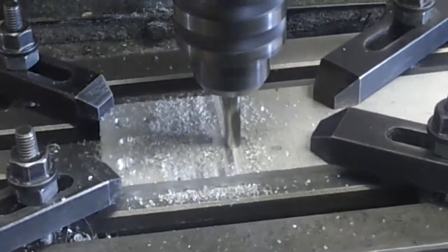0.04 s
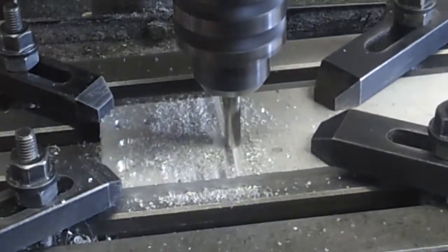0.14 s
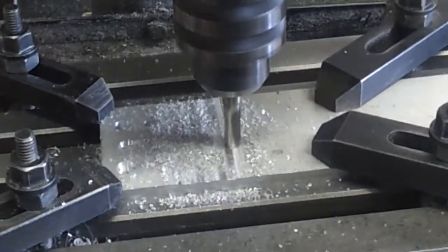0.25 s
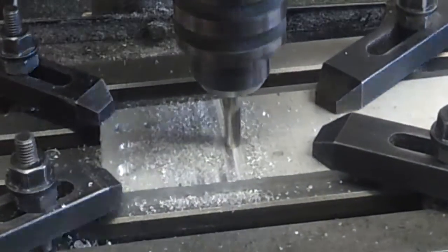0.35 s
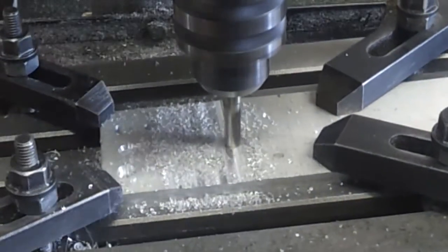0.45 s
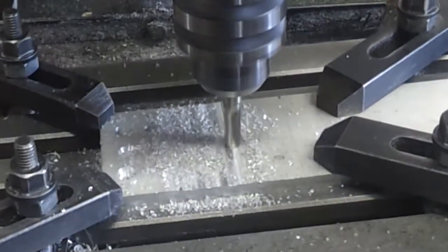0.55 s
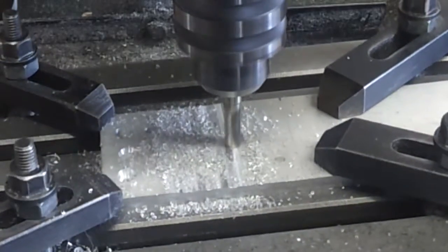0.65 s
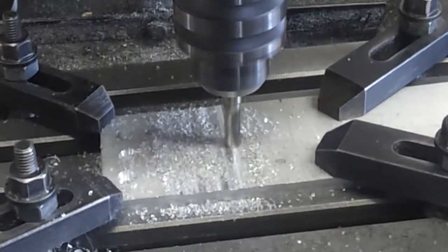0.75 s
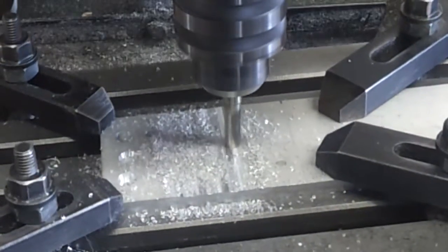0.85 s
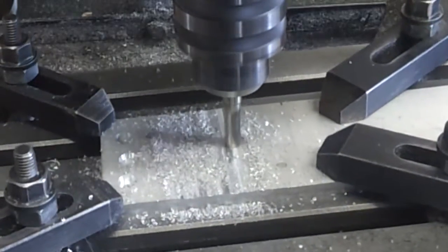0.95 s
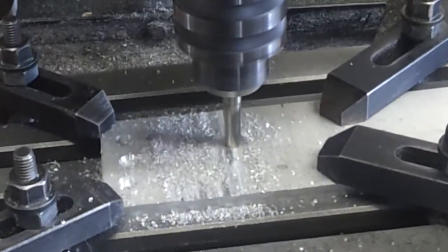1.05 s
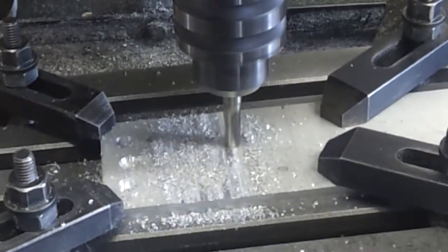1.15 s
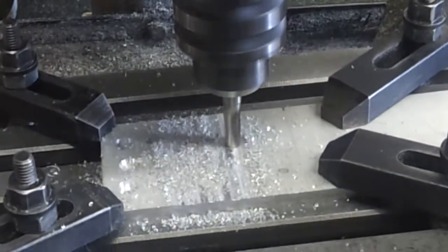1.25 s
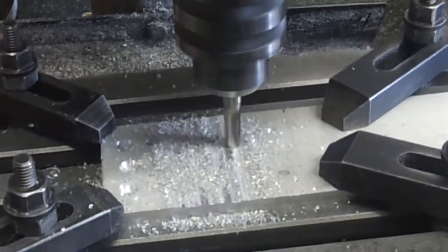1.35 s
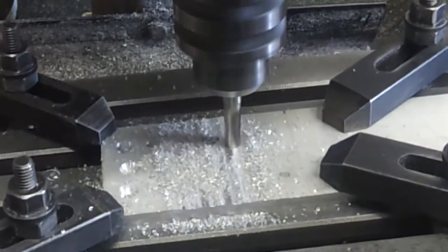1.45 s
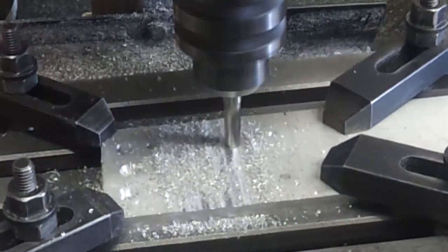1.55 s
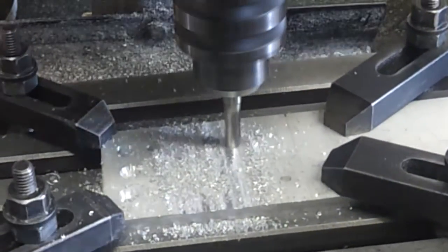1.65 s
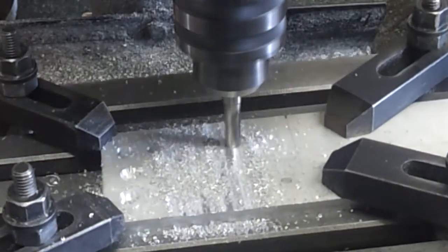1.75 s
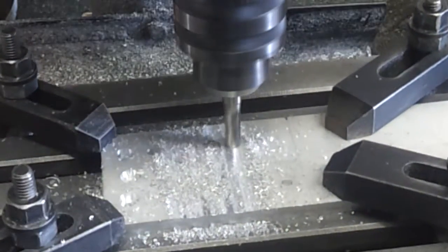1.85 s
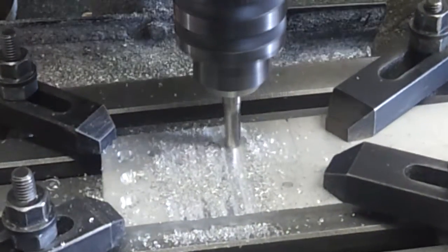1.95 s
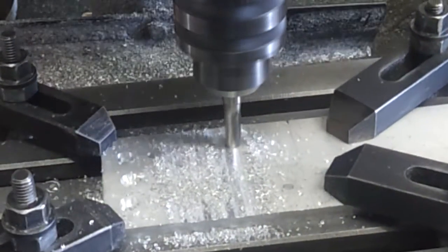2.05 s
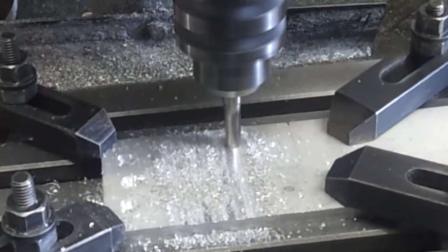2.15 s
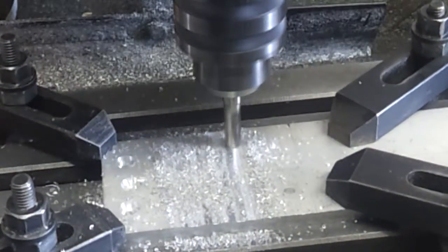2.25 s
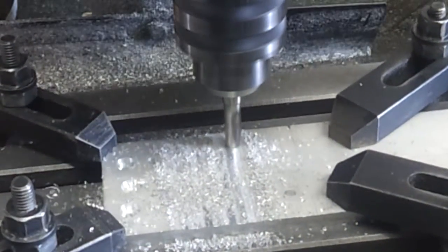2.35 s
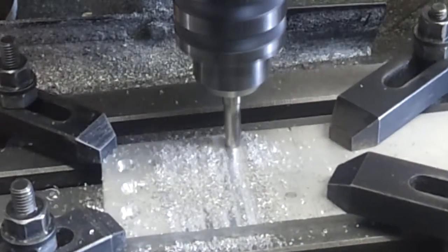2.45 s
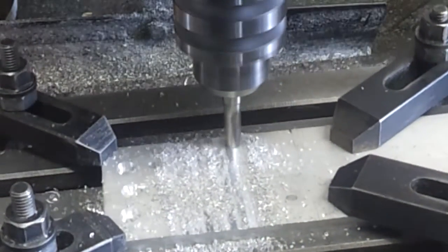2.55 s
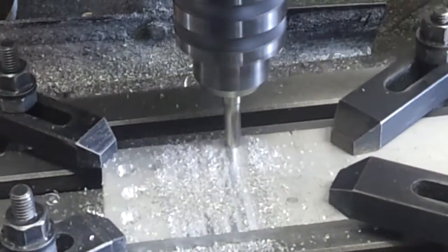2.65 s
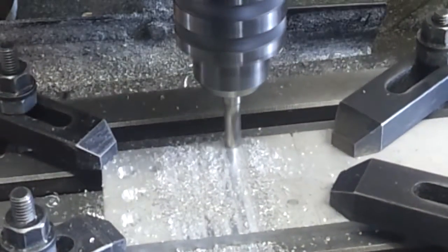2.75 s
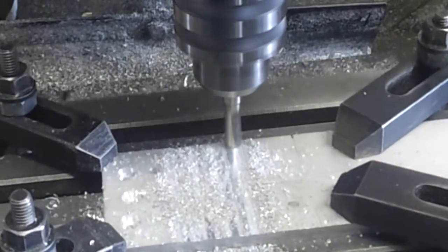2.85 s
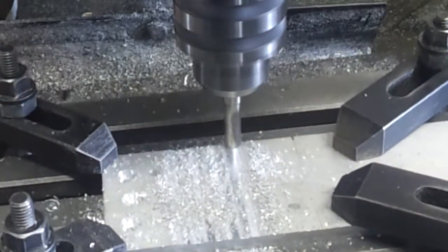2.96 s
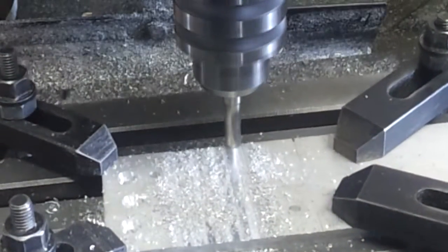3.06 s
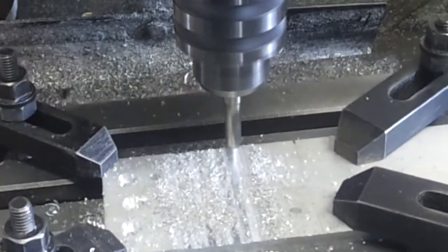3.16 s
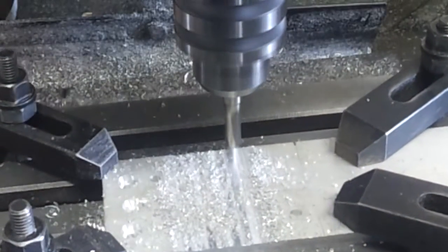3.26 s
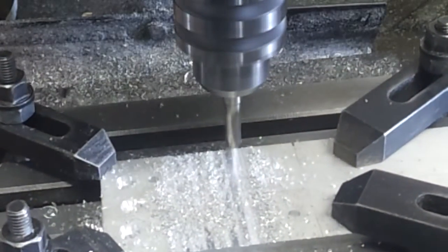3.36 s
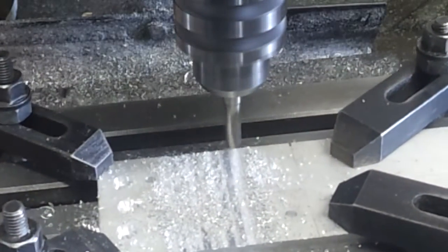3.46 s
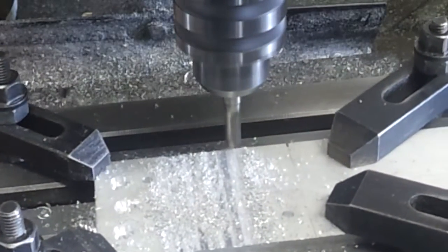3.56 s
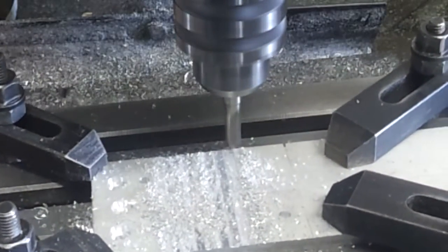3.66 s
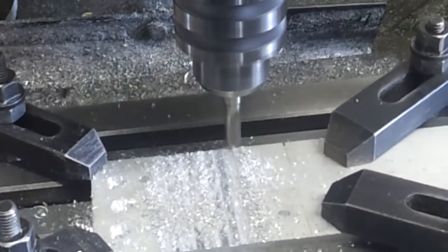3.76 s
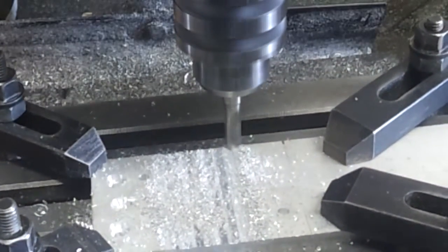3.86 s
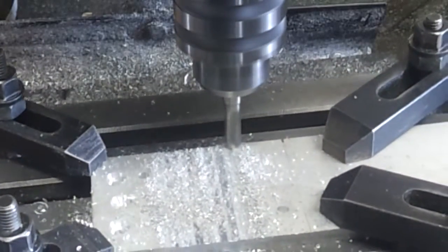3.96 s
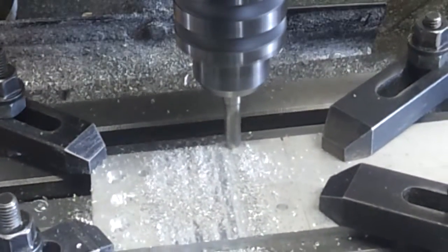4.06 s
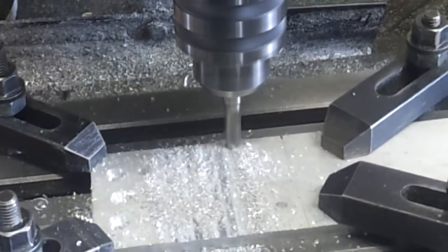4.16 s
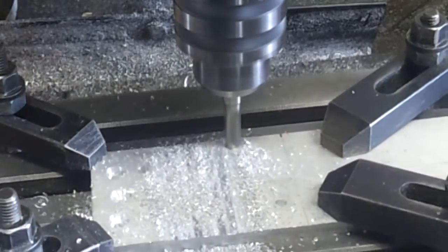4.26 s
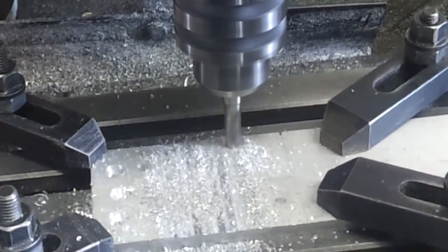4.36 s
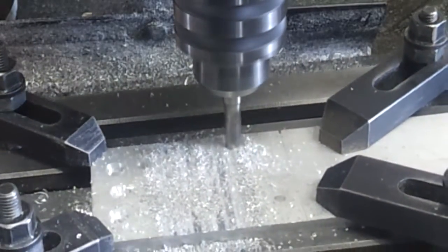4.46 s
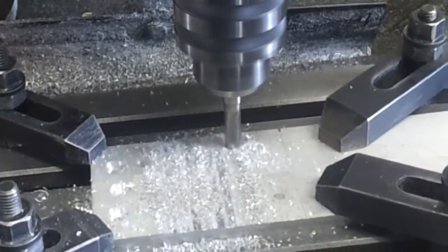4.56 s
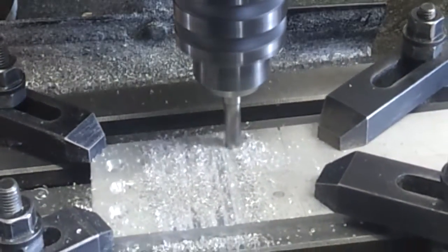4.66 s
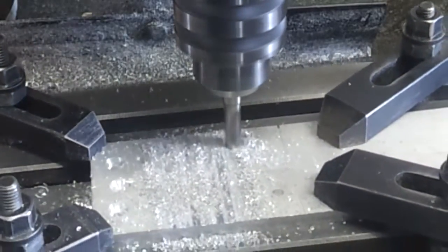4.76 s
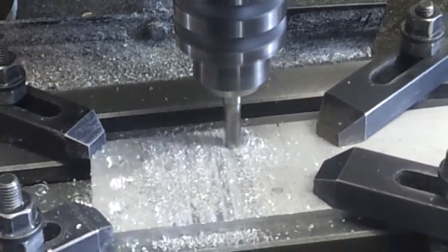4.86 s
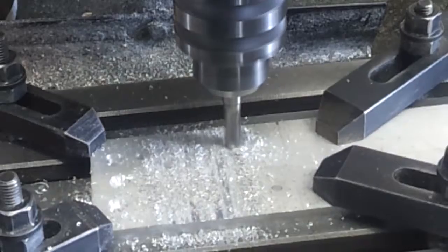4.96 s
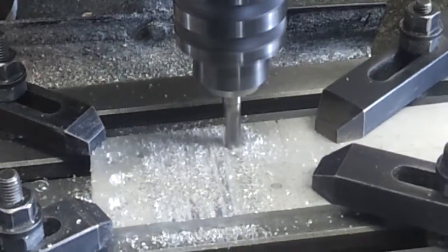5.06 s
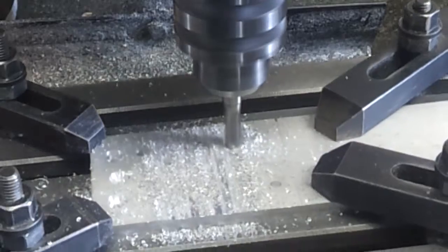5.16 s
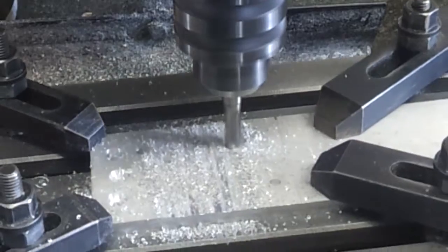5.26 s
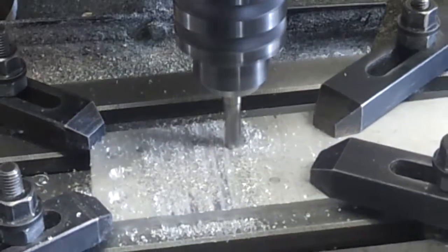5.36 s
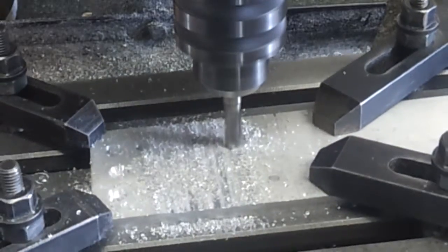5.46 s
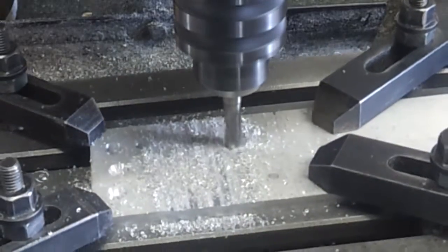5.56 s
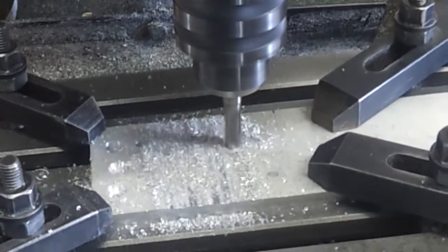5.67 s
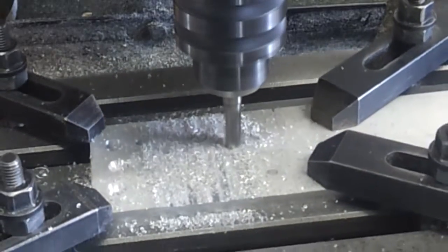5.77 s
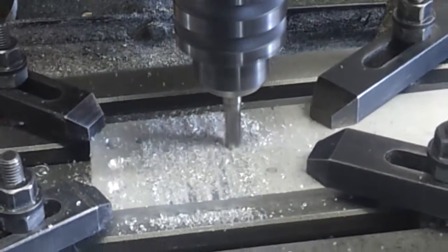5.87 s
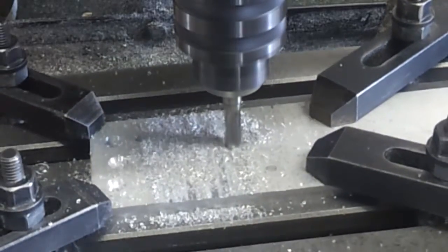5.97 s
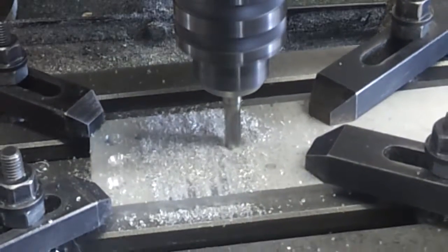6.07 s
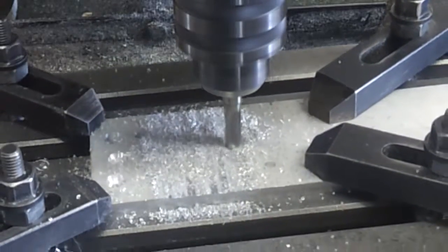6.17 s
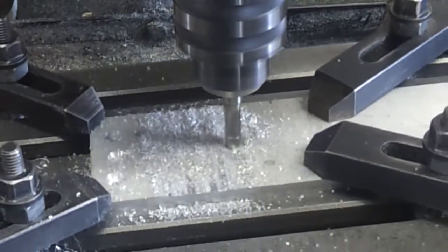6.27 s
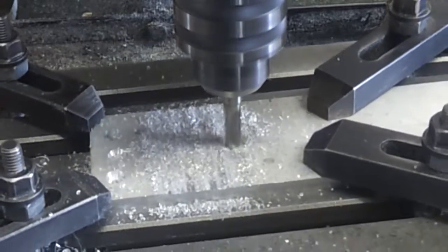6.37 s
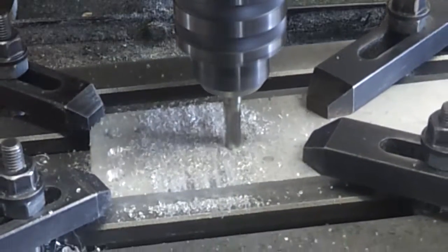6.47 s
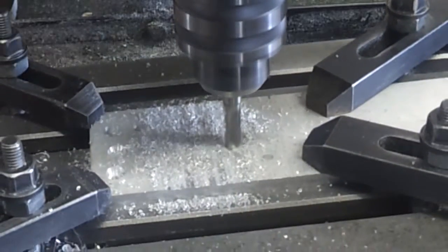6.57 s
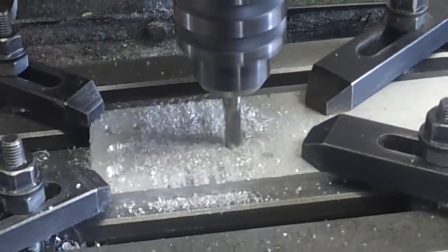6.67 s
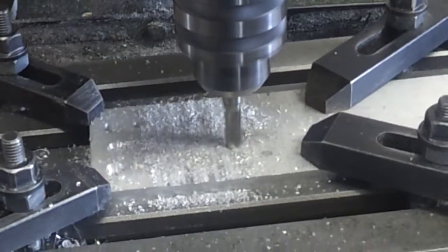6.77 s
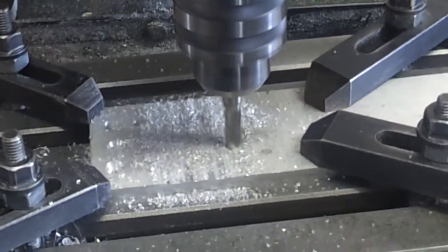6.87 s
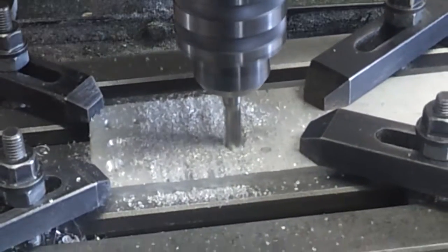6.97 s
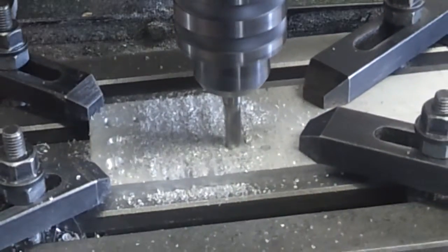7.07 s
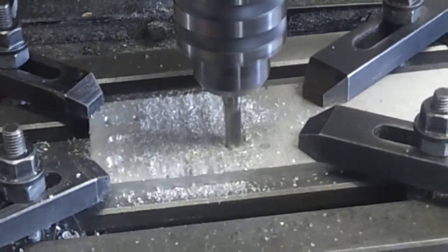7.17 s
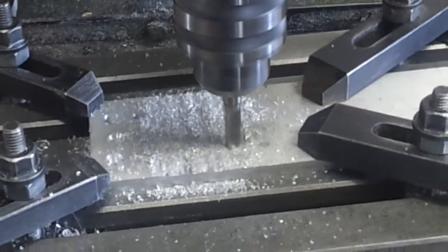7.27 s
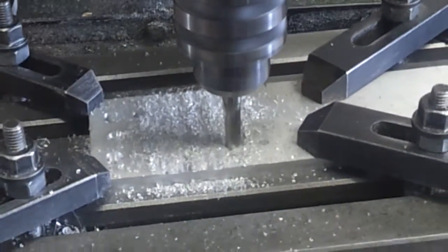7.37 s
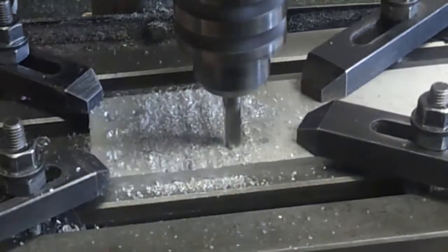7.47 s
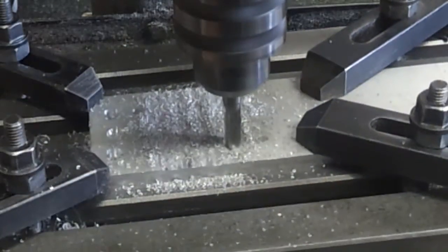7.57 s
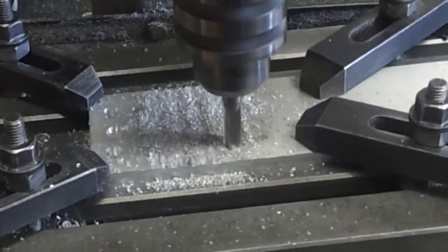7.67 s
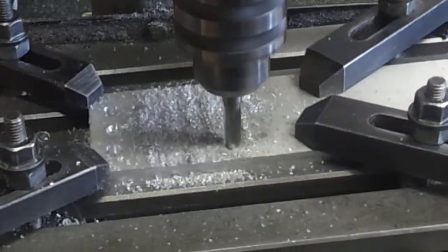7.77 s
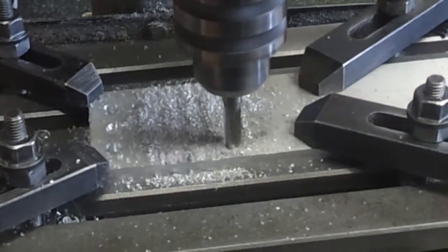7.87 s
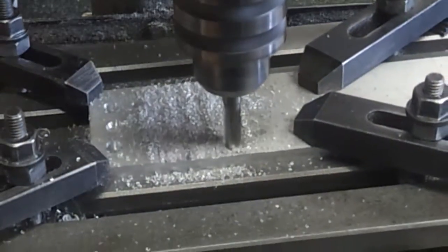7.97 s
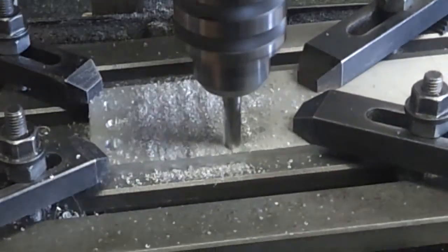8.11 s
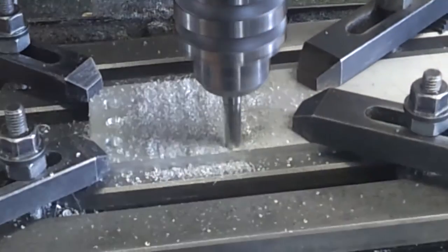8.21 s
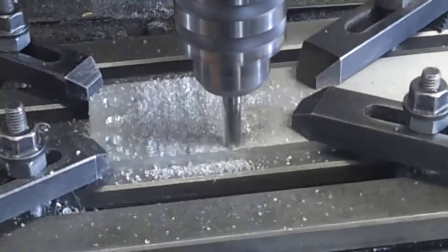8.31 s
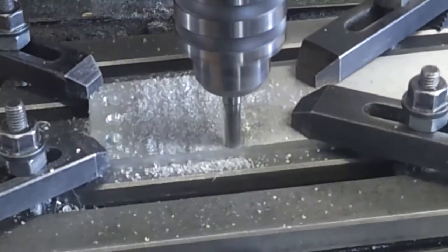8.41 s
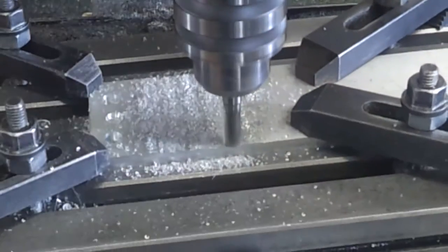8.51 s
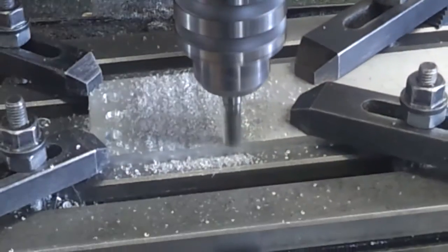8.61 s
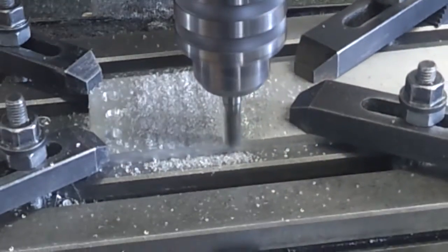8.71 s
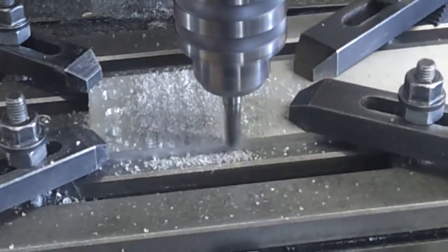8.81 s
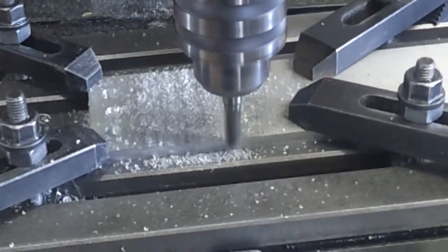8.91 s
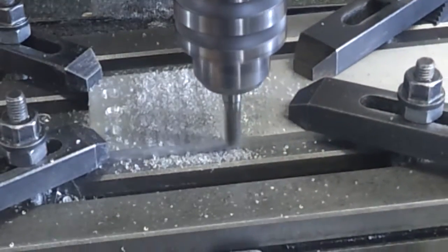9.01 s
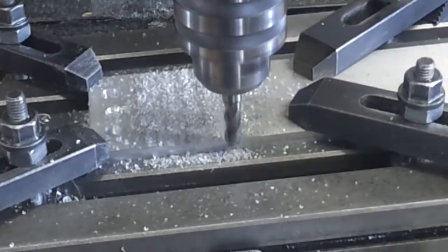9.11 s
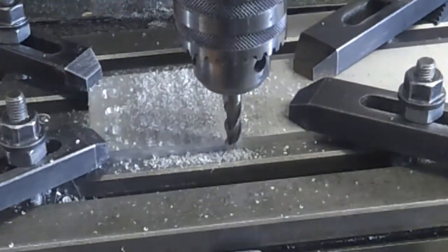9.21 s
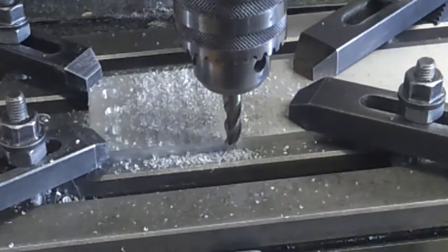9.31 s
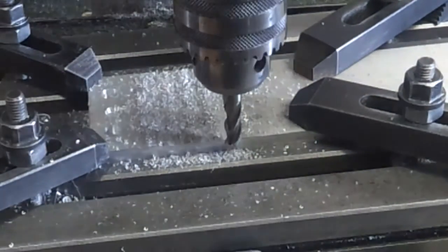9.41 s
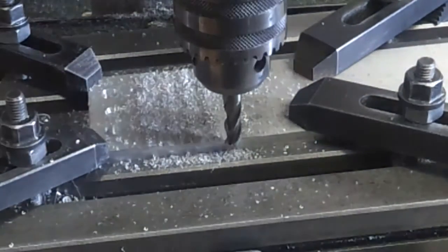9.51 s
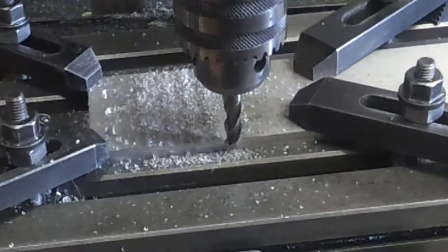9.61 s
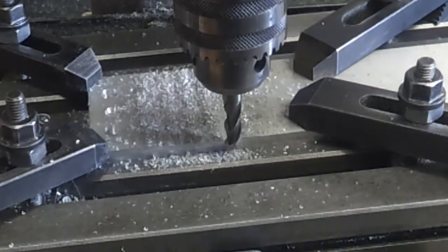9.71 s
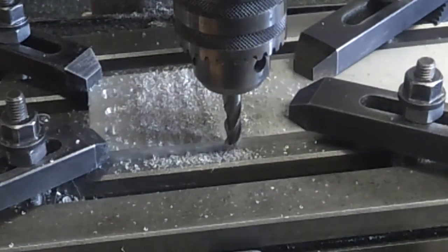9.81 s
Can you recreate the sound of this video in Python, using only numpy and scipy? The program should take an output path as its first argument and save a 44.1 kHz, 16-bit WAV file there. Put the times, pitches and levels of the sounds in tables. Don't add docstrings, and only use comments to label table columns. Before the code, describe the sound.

Close-up milling: gritty metal cutting noise fluttering fast under piercing steady whines, ending in stop jolts, a brief dropout, electric fizz and a clunk.

```python
import sys
import numpy as np
from scipy import signal
from scipy.fft import rfft, irfft, next_fast_len
from scipy.io import wavfile
from scipy.ndimage import uniform_filter1d, minimum_filter1d

SR = 44100
rng = np.random.default_rng(int(sys.argv[2]) if len(sys.argv) > 2 else 0)


def to_wav(sig):
    pcm = np.clip(np.atleast_2d(sig), -1, 1) * 32767
    pcm = np.round(pcm).astype(np.int16)
    wavfile.write(sys.argv[1], SR, pcm.T)


def makeup_ratio(level_db):
    decades = np.asarray(level_db, float) / 20
    return 10 ** decades


N = 434385
TIME, PADDED = np.arange(N) / SR, next_fast_len(N, True)
FREQ = np.fft.rfftfreq(PADDED, 1 / SR) + 1e-3
TURN_HZ = 46.875
STOP_S = 8.83
REST_S = (3.155, 3.59)
TOP_HZ = 14560


def unit(x):
    return x / np.sqrt(np.mean(x ** 2))


def colour(points, rings=()):
    hz, db = np.transpose(points)
    power = makeup_ratio(np.interp(np.log(FREQ), np.log(hz), db)) ** 2
    for centre_hz, width_hz, ring_db in rings:
        power = power + makeup_ratio(ring_db) ** 2 / (1 + (2 * (FREQ - centre_hz) / width_hz) ** 2) ** 2
    return np.sqrt(power)


def noise(gain):
    return irfft(gain * rfft(rng.standard_normal(PADDED)), PADDED)[:N]


def band(lo_hz, hi_hz):
    return 1 / np.sqrt((1 + (lo_hz / FREQ) ** 6) * (1 + (FREQ / hi_hz) ** 6))


def ring(hz, width_hz):
    return unit(noise(1 / (1 + (2 * (FREQ - hz) / width_hz) ** 2)))


def walk(rate_hz):
    k = int(SR / rate_hz)
    steps = np.repeat(rng.standard_normal(N // k + 1), k)
    return unit(uniform_filter1d(uniform_filter1d(steps, k), k)[:N])


def bursts(times_s, sizes, rise_s, fall_s):
    t = np.arange(int(.08 * SR)) / SR
    shape = (1 - np.exp(-(t / rise_s) ** 2)) * np.exp(-t / fall_s)
    starts = np.zeros(N)
    np.add.at(starts, np.clip((np.asarray(times_s) * SR).astype(int), 0, N - 1), sizes)
    return signal.fftconvolve(starts, shape / shape.max())[:N]


def during(start_s, stop_s, edge_s=.007):
    return np.clip(np.minimum(TIME - start_s, stop_s - TIME) / edge_s + .5, 0, 1)


def place():
    return np.maximum(np.maximum(REST_S[0] - TIME, TIME - REST_S[1]), 0)


def whine(hz, level_db, wobble_hz, wobble_db):
    phase = 2 * np.pi * np.cumsum(hz + wobble_hz * walk(45)) / SR
    return np.sqrt(2) * makeup_ratio(level_db + wobble_db * walk(30)) * np.sin(phase)


def hold():
    # from/s, to/s, first level/dB, last level/dB, whistle/dB
    holds = [
        (3.17, 3.56, -27.5, -27.5, -25),
        (8.767, 9.1, -24, -24.5, -33),
        (9.14, 9.9, -21.5, -19.5, -37),
    ]
    # f/Hz, density/dB per Hz
    fizz_colour = [(71, -101), (120, -73), (169, -25.5), (314, -23), (1010, -25), (2800, -26),
                   (5210, -28.5), (6000, -26.5), (10100, -18), (11400, -16), (12600, -15), (14500, -13.5)]
    # f/Hz, width/Hz, level/dB
    fizz_rings = [(318, 14, -14.5), (3020, 1240, -22.5), (11770, 90, -10.5), (12900, 64, -4),
                  (12670, 800, -4)]
    fizz = unit(noise(colour(fizz_colour, fizz_rings)))
    whistle = ring(12600, 490)
    out = 0
    for start_s, stop_s, first_db, last_db, whistle_db in holds:
        fizz_gain = makeup_ratio(np.interp(TIME, (start_s, stop_s), (first_db, last_db)))
        out = out + during(start_s, stop_s, .015) * (fizz_gain * fizz + makeup_ratio(whistle_db) * whistle)
    return makeup_ratio(0.62 * walk(40)) * out


def feed():
    # travel from rest/s, level/dB
    core_levels = [(0, -30.5), (.6, -27.5), (1.3, -26), (2.2, -28.5), (2.95, -33), (3.6, -29), (5.2, -22.5)]
    # f/Hz, width/Hz, level/dB
    overtones = [(9360, 40, -16), (9542, 45, -17)]
    feed_hz, off_s = 3025, 8.742
    rough = sum(makeup_ratio(db) * ring(hz, width_hz) for hz, width_hz, db in overtones)
    skirt = makeup_ratio(-39.5) * ring(feed_hz, 110)
    core = whine(feed_hz, np.interp(place(), *np.transpose(core_levels)), 4.92, 0.3)
    out, back = during(-1, REST_S[0]), during(REST_S[1], off_s)
    return (out + back) * (core + skirt) + (makeup_ratio(-27) * out + makeup_ratio(-39) * back) * rough


def spindle():
    # travel from rest/s, width/s, level out/dB, level back/dB
    dips = [(1.0, 0.17, -13, -6.5), (1.6, .35, -1.5, 3), (2.27, .15, -14, -9), (2.85, 0.22, -6, -0.5),
            (3.2, .2, 0, 0), (3.89, .2, -1, -14.5)]
    off_s = 8.78
    out = TIME < REST_S[1]
    back_shift_s, back_stretch = .27, .85
    at_s = np.where(out, place(), back_shift_s + back_stretch * place())
    dips_db = 0
    for s, width_s, out_db, back_db in dips:
        dips_db = dips_db + np.where(out, out_db, back_db) * np.exp(-((at_s - s) / width_s) ** 2)
    return during(-1, off_s) * whine(11175.5, -23 + dips_db, 3.2, 1.0)


def clunk():
    # t/s, level/dB, ring length factor
    blows = [
        (9.681, -19, .5),
        (9.691, -18, 1.7),
        (9.71, -4, 0.48),
        (9.7123, -3, 0.27),
        (9.716, -9, 0.96),
        (9.723, -9, 0.82),
        (9.728, -10, 0.65),
        (9.732, -14, .9),
        (9.743, -19, .9),
        (9.749, -18, .9),
    ]
    # f/Hz, level/dB, t60/s
    modes = [(234, -18, 0.14), (477, -17, 0.047), (686, -4, 0.046), (930, 0.5, 0.045), (1380, -6, 0.022),
             (2600, -16, .02), (3500, -11, .015)]
    t, out = np.arange(int(.2 * SR)) / SR, np.zeros(N + SR)
    hz, db, t60_s = np.transpose(modes)[:, :, None]
    chance = rng.standard_normal((len(blows), 2, len(modes), 1))
    for (s, blow_db, length), (size, detune) in zip(blows, chance):
        decay_db = 60 * t / t60_s / length
        tones = np.sin(2 * np.pi * hz * (1 + 0.05 * detune) * t)
        rings = makeup_ratio(db + 2.6 * size - decay_db) * tones
        out[int(s * SR):int(s * SR) + len(t)] += 0.29 * makeup_ratio(blow_db) * rings.sum(0)
    tail_s = 9.712
    tail_gain = (TIME > tail_s) * makeup_ratio(-28.0 - 160 * np.abs(TIME - tail_s))
    tail = tail_gain * unit(noise(band(150, 3400)))
    return irfft((rfft(out, PADDED) + rfft(tail, PADDED)) * band(160, 9000), PADDED)[:N]


def jolts():
    # t/s, peak/dB, low/dB, middle/dB, high/dB
    scrapes = [
        (8.763, -4, -20, -29, -25),
        (8.788, -8, -24, -30, -28),
        (8.819, -7, -23, -38, -35),
        (8.842, -6, -25, -27, -13),
        (8.894, -14, -35, -36, -33),
        (8.927, -9, -31.5, -30, -17.5),
        (9.019, -9, -41, -39, -28),
    ]
    s, _, *levels_db = np.transpose(scrapes)
    ranges = ((350, 1240, 1.1), (1600, 3100, 1.4), (5530, 22000, -1.5))  # low/Hz, high/Hz, level/dB
    out = 0
    for level_db, (lo_hz, hi_hz, more_db) in zip(levels_db, ranges):
        envelope = bursts(s - .002, makeup_ratio(level_db + more_db), rise_s=.005, fall_s=.007)
        out = out + envelope * unit(noise(band(lo_hz, hi_hz)))
    return out


def plate():
    level_db = np.interp(TIME, (0, 3.6), (-37, -29))
    fade_db = 185 * np.maximum(TIME - STOP_S, 0)
    return makeup_ratio(level_db - fade_db) * ring(693.3, 51)


def cut():
    # from/Hz, to/Hz
    level_bands = [(150, 550), (600, 1000), (1100, 1800), (1900, 2800), (6000, 10500)]
    splits_hz = [0, 580, 1050, 1850, 5600, 30000]
    # f/Hz, density/dB per Hz
    cut_colour = [(25, -42), (90, -22.5), (170, -20.5), (290, -9.5), (560, -12), (950, -6.5), (1050, -20),
                  (1700, -24), (2300, -24.5), (4500, -24), (6200, -50.5), (8500, -36), (11000, -30.5),
                  (14500, -34)]
    # f/Hz, width/Hz, level/dB
    frame_rings = [(357, 33, -14.5), (876, 66, -1), (914.6, 44, -0.5), (1311, 86, -12), (1415, 40, -17.5),
                   (1542, 166, -16.5), (1970, 80, -32), (3430, 270, -19.5), (5370, 88, -26.5),
                   (6320, 250, -39.5), (7015, 120, -36), (7570, 50, -37), (9440, 130, -29),
                   (10900, 130, -23.5)]
    # t/s, peak/dB, edge minus peak/dB
    bites = [(0.612, -9, -27), (1.041, -18, -22), (1.211, -10.5, -18), (1.453, -8, -18), (1.7, -13, -10),
             (2.062, -4, -28), (2.625, -13, -8), (3.495, -3.5, -19), (3.558, -9, -6), (3.682, -2, -13),
             (3.986, -9, -16), (4.049, -5.5, -22), (4.412, -9, -8), (4.668, -6, -25), (5.398, -8, -2),
             (5.523, -6.5, -17), (5.63, -5, -13), (5.651, -7.5, -13), (5.754, -10.5, -9), (5.847, -10, -13),
             (5.956, -5, -8), (6.099, 3.5, -15), (6.298, -4.5, -20), (6.503, -12.5, -1), (6.658, -7.5, -22),
             (6.811, -5, -11), (6.956, -4.5, -11), (7.098, 0, -23), (7.399, -21, -18), (8.127, -14, -7)]
    # t/s, level/dB
    load = [(0.0, -26.5), (0.02, -26.5), (2.33, -28), (3.43, -33), (3.65, -27), (3.8, -30), (4.11, -24),
            (4.19, -28), (6.17, -25), (7.89, -27.5), (8.5, -31.5), (8.8, -32)]
    # level at mean load/dB, slope/dB per dB of load, extra on the way out/dB
    layers = [
        (-27.5, 0.28, 1.5),
        (-23, 0.3, 1),
        (-27, 1.0, 0),
        (-35, .5, 0.36),
        (-32, 0.06, -0.06),
    ]
    # swell depth, shared scatter/dB, own scatter/dB, bite/dB, share of edge colour, chip ticks
    play = [(0.6, 2.5, 2.4, 0.1, 0.11, 0.034), (0.5, 2.8, 3.0, 5.5, 0, 0.14), (.9, 2.8, 1.9, 7.5, 0.075, 0.18),
            (.95, 4.0, 1.6, 5, 0.6, 0.15), (.9, 4.0, 1.2, -3, 0.4, .06)]
    turns = np.arange(int(N / SR * TURN_HZ) + 2)
    turn_at = TIME * TURN_HZ + .5
    swell = np.sin(np.pi * turn_at) ** 4
    shared = np.clip(rng.standard_normal(len(turns)), -2.5, 1.6)
    snaps = rng.random((200, 2))
    snap_db = np.minimum(-3.5 * np.log(snaps[:, 1]), 11)
    chips = bursts(snaps[:, 0] * 8.8, makeup_ratio(snap_db), .002, .004)
    bite_s, bite_db, edge_db = np.transpose(bites)
    load_db = np.interp(TIME, *np.transpose(load)) + 27.5
    stop_db = -500 * np.maximum(TIME - STOP_S, 0)
    light = makeup_ratio(-8.5) * np.maximum(shared - 1.12, 0) ** .5 * (turns / TURN_HZ < STOP_S)
    gain, out = colour(cut_colour, frame_rings), 0
    for k, (mean_db, slope, out_db) in enumerate(layers):
        level_db = mean_db + slope * load_db + out_db * during(-1, REST_S[0], .4) + stop_db
        depth, shared_db, own_db, punch_db, edge, tick = play[k]
        own = np.minimum(rng.standard_normal(len(turns)), 1.5)
        size = makeup_ratio(shared_db * shared + own_db * own)[turn_at.astype(int)]
        throb = unit((1 + depth * size * swell + tick * chips) * makeup_ratio(0.39 * walk(12)))
        bite = makeup_ratio(bite_db + 2 + punch_db + edge * (edge_db + 15.5))
        throb = throb + bursts(bite_s - .0015, bite, .0035, .0035)
        throb = throb + bursts((turns - .25) / TURN_HZ, light * makeup_ratio(punch_db), .0035, .0035)
        inside = (FREQ > splits_hz[k]) & (FREQ <= splits_hz[k + 1])
        lo_hz, hi_hz = level_bands[k]
        in_band = (FREQ > lo_hz) & (FREQ < hi_hz)
        scale = np.sqrt(np.sum(gain[in_band] ** 2) / len(FREQ))
        out = out + makeup_ratio(level_db) * throb * noise(gain * inside / scale)
    return out


def scene():
    mid = hold() + feed() + spindle() + clunk() + jolts() + plate() + cut()
    return np.array([mid, mid])


def phone(mid):
    # f/Hz, level/dB
    side_colour = [(25, -27), (70, -21), (250, -31), (800, -43.5), (1500, -35), (2300, -23), (3000, -35.5),
                   (4700, -15.5), (6500, -17), (8500, -19.5), (10500, -33), (12000, -31.5), (14300, -20.5)]
    hop = int(SR / TURN_HZ)
    hz, _, cells = signal.stft(mid, SR, nperseg=2 * hop)
    group = np.arange(len(hz)) // 5
    power = np.add.reduceat(np.abs(cells) ** 2, np.arange(0, len(hz), 5))
    chance = rng.standard_normal((3,) + power.shape)
    drift_db = 4 * uniform_filter1d(chance[0, :1], size=9) + 6.5 * uniform_filter1d(chance[1], size=4)
    limit_db = -56.0 + drift_db + 2.5 * np.log10(power.sum(0) + 1e-9)
    heard = uniform_filter1d(power, size=2, axis=0) > makeup_ratio(2 * limit_db)
    mute = np.where(heard[group] | (hz[:, None] < 250), 1, makeup_ratio(-30))
    top = np.clip((TOP_HZ + 60 - hz[:, None]) / 90, 0, 1) ** 2
    kept = cells * mute * top
    side_hz, level_db = np.transpose(side_colour)
    side_db = np.interp(np.log(hz + 1), np.log(side_hz), level_db)
    bed = np.sqrt(minimum_filter1d(power, size=3, axis=0) / 5)[group]
    patches = makeup_ratio(side_db[:, None] - 4 + 4.6 * chance[2, :1] + 6.8 * chance[2, group // 2 + 1])
    side = bed * patches * np.exp(2j * np.pi * rng.random(cells.shape))
    mid, side = (signal.istft(c, SR, nperseg=2 * hop)[1][:N] for c in (kept, side))
    return np.array([mid + side, mid - side])


def band_limit(x):
    return signal.sosfilt(signal.butter(12, 15840, fs=SR, output="sos"), x)


def record(dry):
    stop_s, start_s = 9.042, 9.226
    gate = np.where(TIME < stop_s, 1, makeup_ratio(-22 - 3000 * (TIME - stop_s)) * (TIME < stop_s + .009))
    gate = np.maximum(gate, np.clip((TIME - start_s) / .003 + 1, 0, 1) ** 4)
    gate = gate + makeup_ratio(-47) * np.exp(-((TIME - 9.189) / .006) ** 4)
    rounded = .95 * np.tanh(dry[0] / .95)
    top = signal.ellip(12, .2, 90, TOP_HZ, fs=SR, output="sos")
    return band_limit(signal.sosfilt(top, phone(rounded) * gate))


dry = scene()
out = record(dry)
to_wav(out)
```